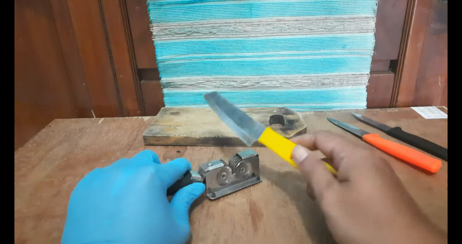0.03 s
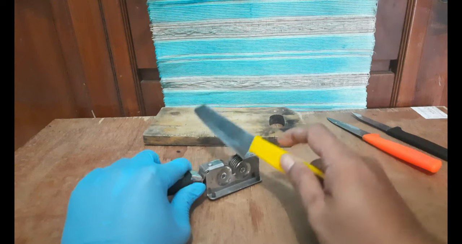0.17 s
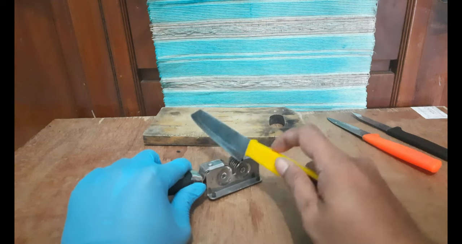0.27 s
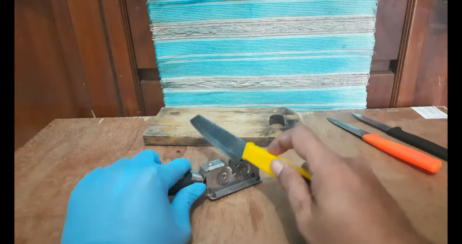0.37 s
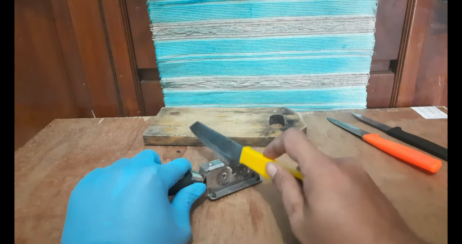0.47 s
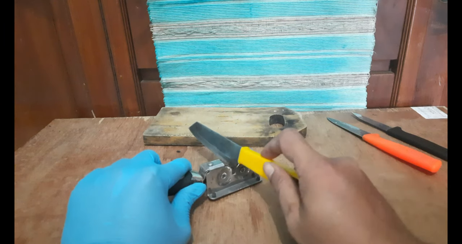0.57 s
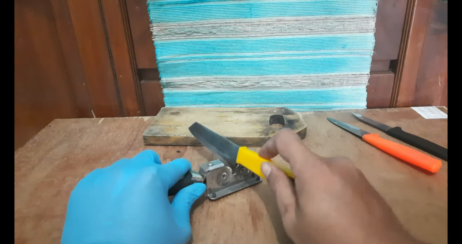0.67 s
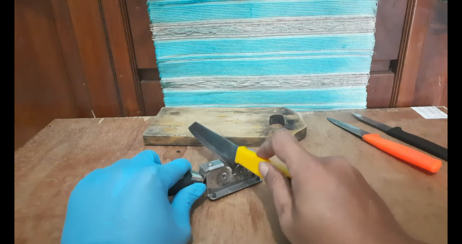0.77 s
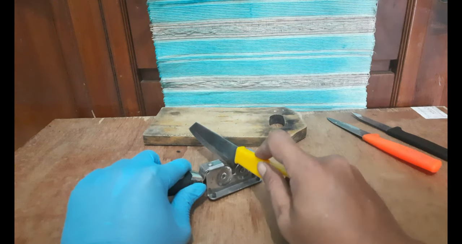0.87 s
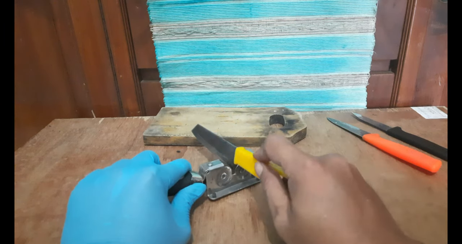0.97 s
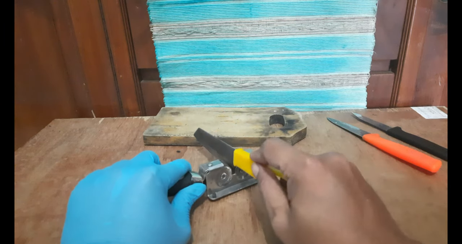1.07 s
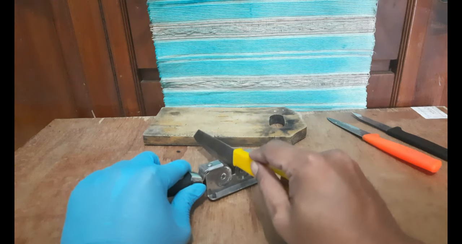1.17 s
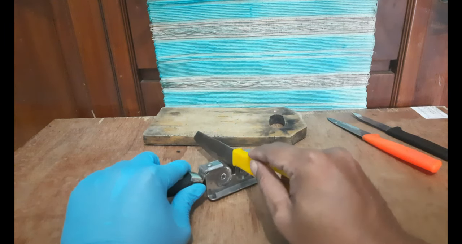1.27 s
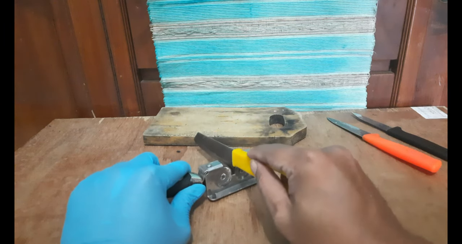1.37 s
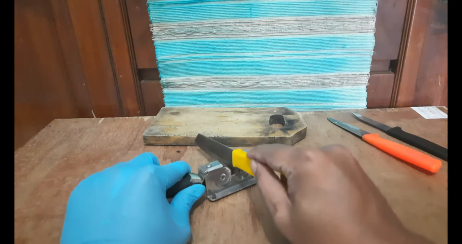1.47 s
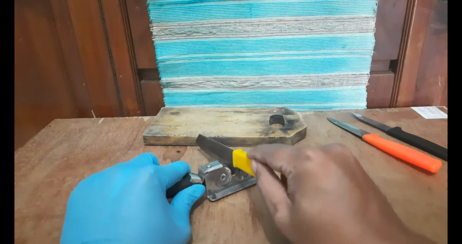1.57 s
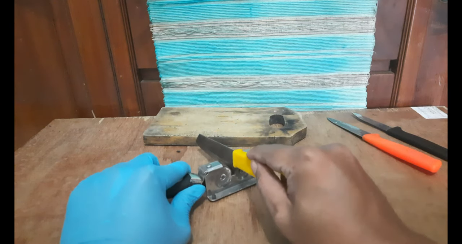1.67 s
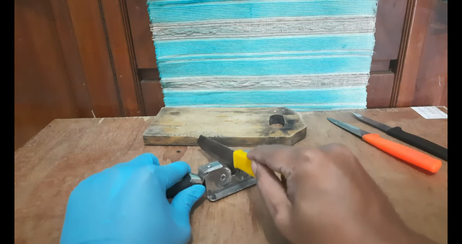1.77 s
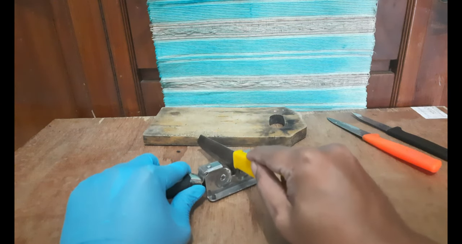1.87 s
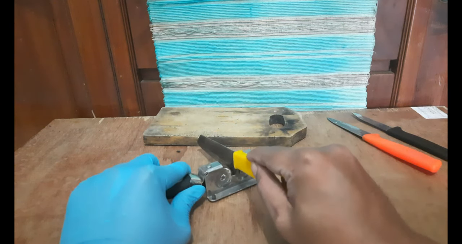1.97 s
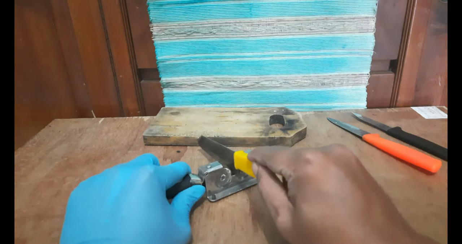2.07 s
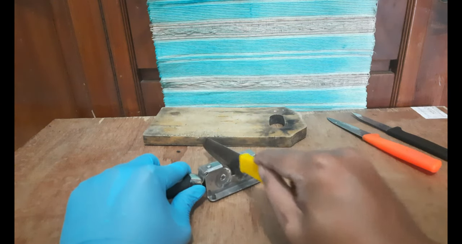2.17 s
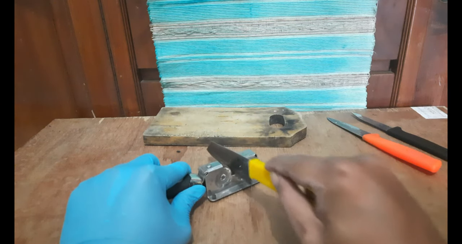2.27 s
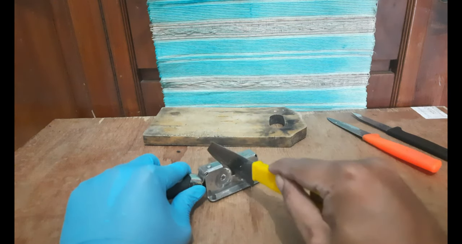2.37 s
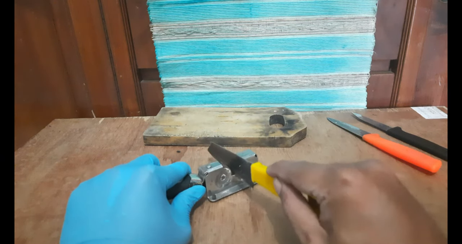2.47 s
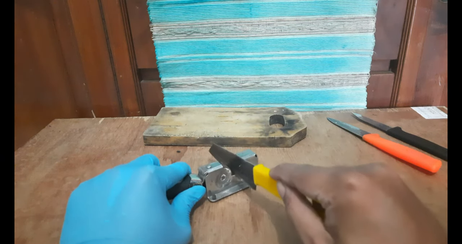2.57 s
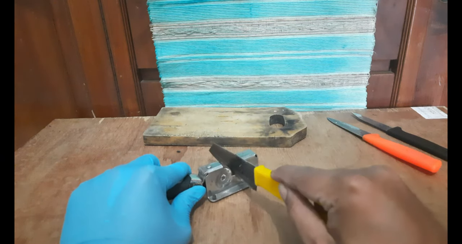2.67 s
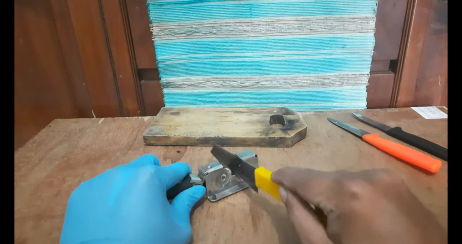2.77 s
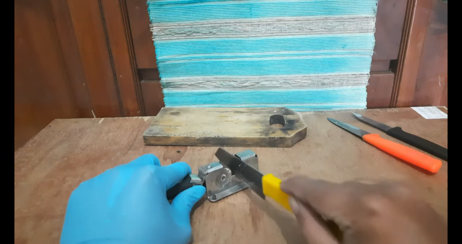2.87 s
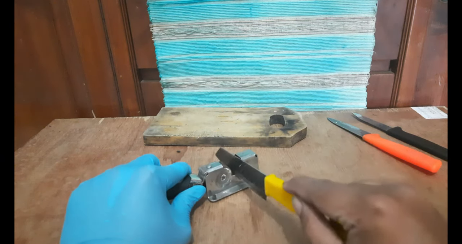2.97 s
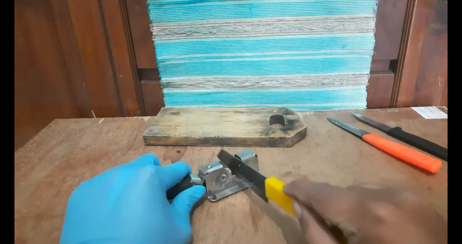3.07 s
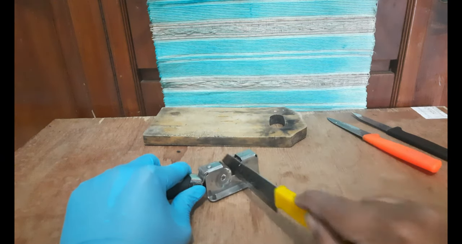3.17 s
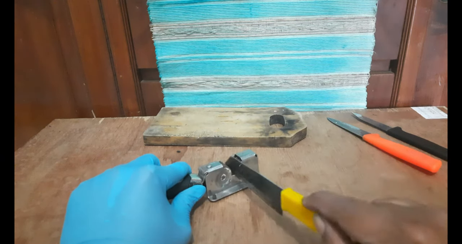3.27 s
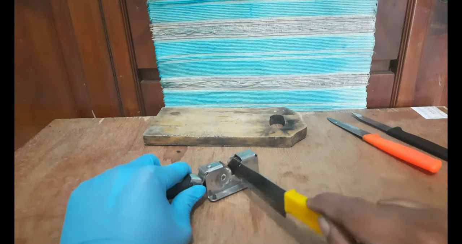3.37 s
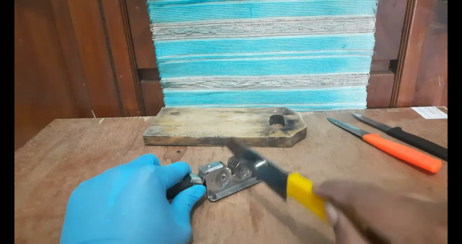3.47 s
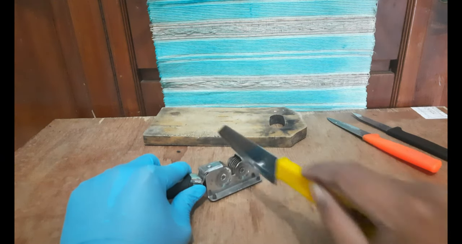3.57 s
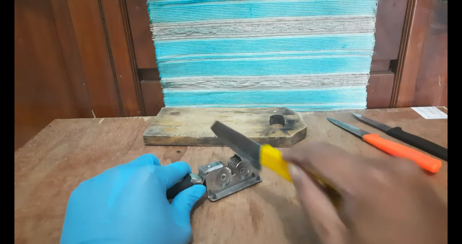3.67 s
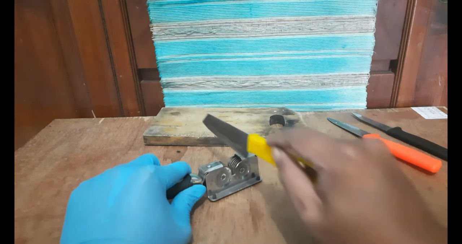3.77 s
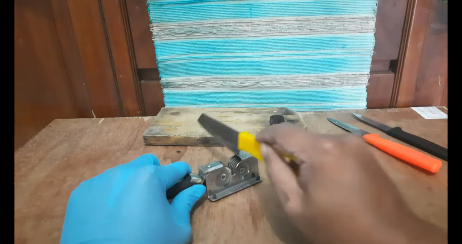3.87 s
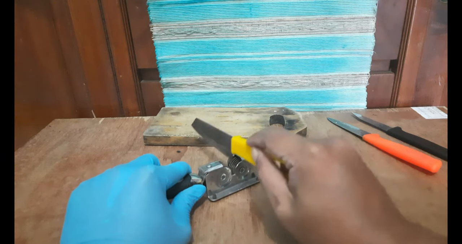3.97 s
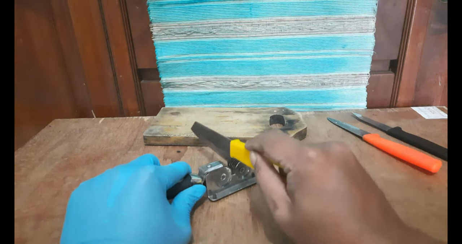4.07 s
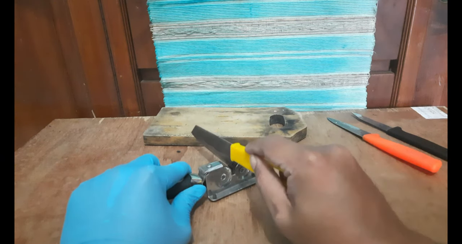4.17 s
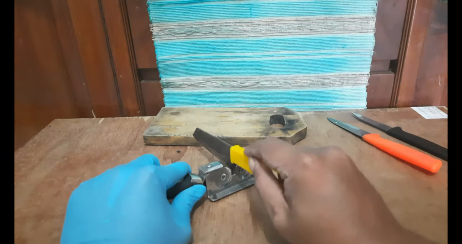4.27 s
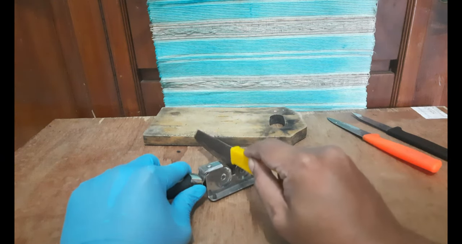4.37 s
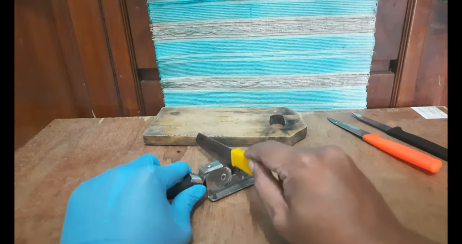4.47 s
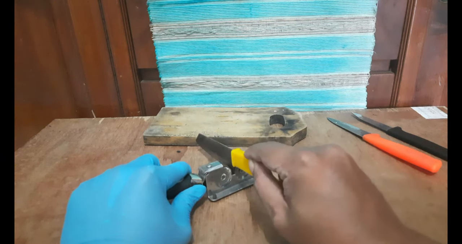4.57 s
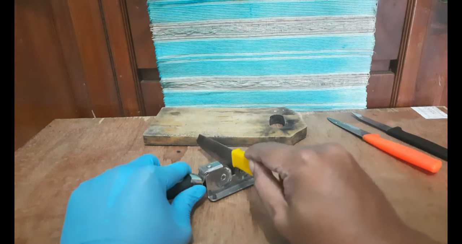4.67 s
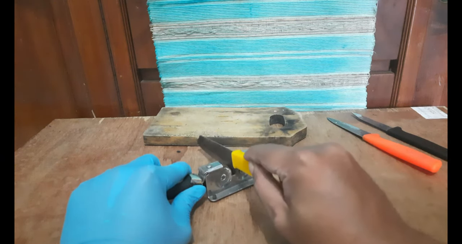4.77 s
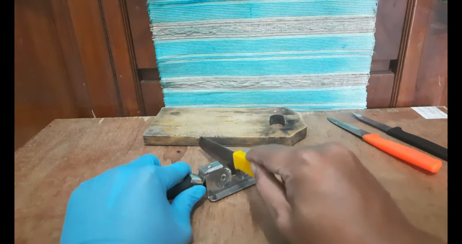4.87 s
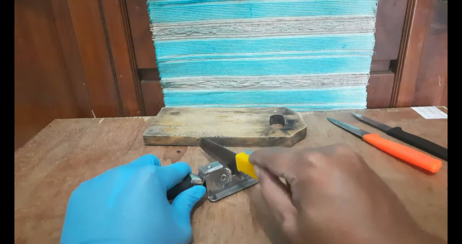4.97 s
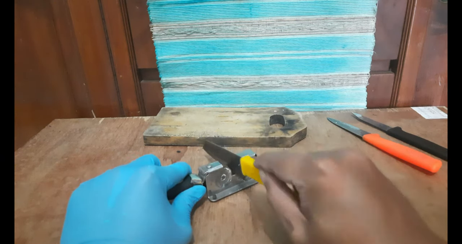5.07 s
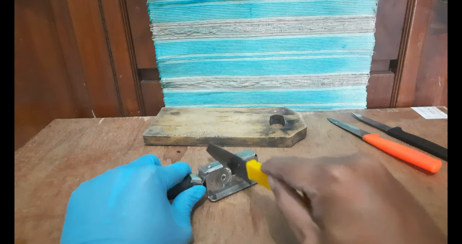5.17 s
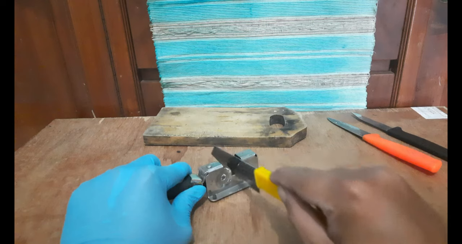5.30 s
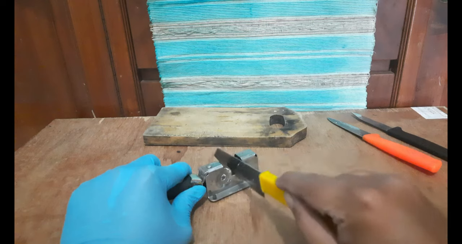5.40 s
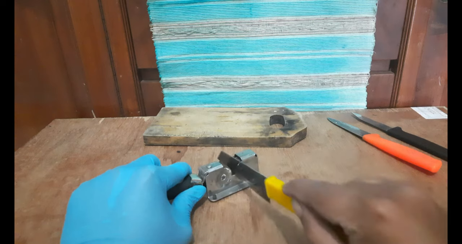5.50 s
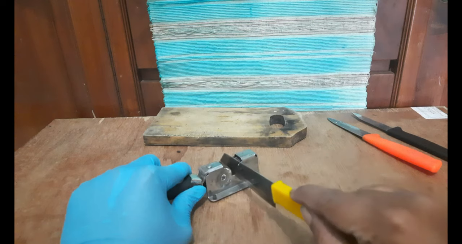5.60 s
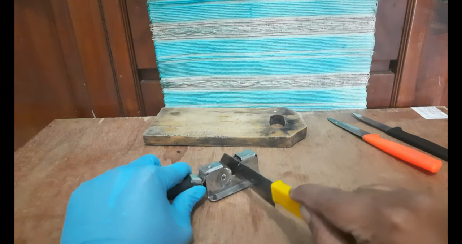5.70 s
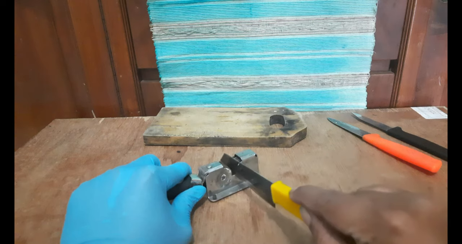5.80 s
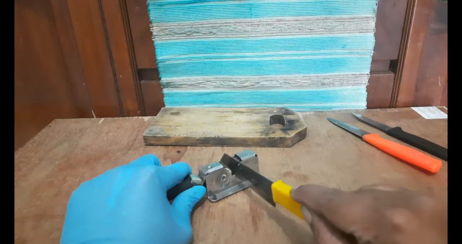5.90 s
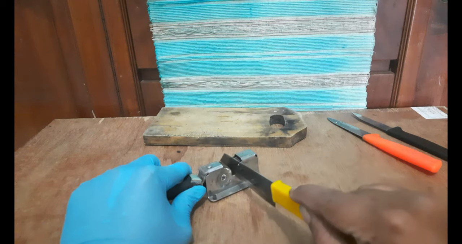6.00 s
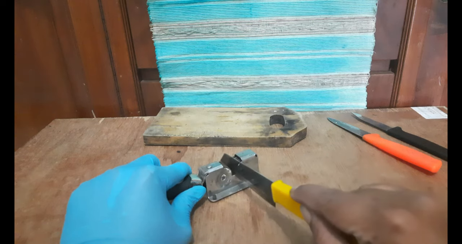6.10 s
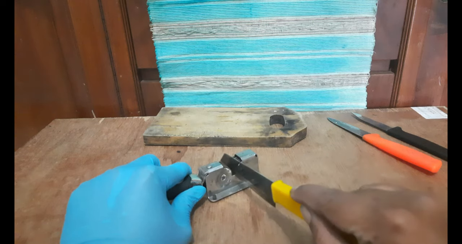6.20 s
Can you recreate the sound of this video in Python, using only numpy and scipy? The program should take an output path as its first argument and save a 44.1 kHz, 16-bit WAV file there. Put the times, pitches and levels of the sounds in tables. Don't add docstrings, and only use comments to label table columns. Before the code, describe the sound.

Faint room hush and tiny taps come first. A blade clinks onto a metal sharpener and catches repeatedly, giving stuttering, raspy metal scrapes with woody thumps from the table and one especially sharp clack at the end. A quiet pause follows, then a slower coarse scrape in joined strokes, ending in soft knocks. Close stereo pickup, short natural room reflections, the sound dry and detailed.

```python
import sys
import numpy as np
from scipy import signal
from scipy.fft import rfft, irfft, next_fast_len
from scipy.io import wavfile
from scipy.ndimage import map_coordinates

SR = 44100
rng = np.random.default_rng(int(sys.argv[2]) if len(sys.argv) > 2 else 0)


def magnitude_from_level(level_db):
    exponent = np.asarray(level_db, float) / 20
    return 10 ** exponent


def inscribe(sig):
    pcm = np.round(np.clip(np.atleast_2d(sig).T, -1, 1) * 32767)
    wavfile.write(sys.argv[1], SR, pcm.astype(np.int16))


N = 275184

# (start [s], length [s], load [dB], load change [dB], bite [dB])
JERKS = [(1.066, 0.26, -51.5, -8, 4), (1.514, 0.026, -37.5, 5, -3.5), (1.555, 0.027, -41, -18.5, -23.5),
         (1.755, 0.038, -46, -1, -3.5), (1.804, 0.11, -24.5, -14, -3.5), (2.002, 0.02, -35.5, -10, 10.5),
         (2.03, 0.022, -26, 1.5, -20.5), (2.093, 0.028, -32.5, 5, -13.5), (2.122, 0.21, -29.5, 2, 2),
         (2.514, 0.1, -39, 5.5, -0.5), (2.783, 0.072, -38.5, 5, 5), (2.885, 0.032, -28, -1, 6),
         (3.08, 0.11, -40.5, 3.5, 8), (3.205, 0.15, -26.5, -14.5, 3), (3.393, 0.034, -31.5, -4, -10.5)]
# (start [s], length [s], load [dB], load change [dB], bite [dB])
SLOW_PULL = [
    (4.763, 0.11, -31, 0, -27.5),
    (4.897, 0.068, -26, 1, -22),
    (4.989, 0.041, -32.5, 3, -5),
    (5.032, 0.13, -35.5, 6.5, -4),
    (5.207, 0.19, -27.5, 0, -2.5),
    (5.428, 0.18, -33.5, 2, -2),
]
# (start [s], length [s], load [dB], load change [dB], bite [dB])
SHIFTS = [(0.997, 0.066, -62, 13, -29), (1.35, 0.12, -45, 2.5, -30.5), (1.669, 0.07, -40.5, 2.5, -41),
          (2.465, 0.019, -63.5, 7.5, -10), (2.722, 0.14, -51.5, -4.5, -10), (3.334, 0.036, -51.5, 1, -14),
          (4.202, 0.11, -59.5, 10, -18), (4.431, 0.078, -44.5, 1, -34), (4.623, 0.069, -58, 0.5, -17),
          (5.853, 0.092, -41, -5, -7.5), (6.011, 0.17, -41, -21.5, -23)]


def unit(x):
    return x / np.sqrt(np.mean(x ** 2) + 1e-20)


def along(points, hz):
    f, v = np.transpose(points)
    return np.interp(np.log(hz + 1), np.log(f + 1), v)


def filtered(x, response):
    m = next_fast_len(N + SR // 2)
    return irfft(rfft(x, m) * response(np.fft.rfftfreq(m, 1 / SR)), m)[..., :N]


def body(modes):
    def shape(f):
        total = 0
        for k, (centre, width, db) in enumerate(modes):
            resonance = 1j * f * width / (centre ** 2 - f * f + 1j * f * width)
            total = total + (-1) ** k * magnitude_from_level(db) * resonance
        return total

    norm = np.sqrt(np.mean(np.abs(shape(np.arange(SR // 2))) ** 2))
    return lambda f: shape(f) / norm


def room_tone():
    # (frequency [Hz], level [dB per Hz])
    quiet = [(15, -40), (25, -10), (102, 0), (194, -5), (255, 0), (425, -7), (604, -16), (1090, -21),
             (1680, -21), (2970, -32), (6660, -38.5), (8730, -30), (10500, -35), (15800, -36)]
    # (frequency [Hz], likeness [0-1])
    alike = [(60, 0), (290, 0), (640, 0), (1500, 0.8), (15000, 0.48)]
    # (frequency [Hz], level [dB])
    quiet_lean = [(60, 15), (240, 5.5), (950, 6.5), (3770, 4), (15000, 8)]

    def colour(f):
        turn = np.arccos(np.clip(along(alike, f), -1, 1)) / 2
        whine = 1 + magnitude_from_level(3) / (1 + ((f - 8750) / 70) ** 2)
        return magnitude_from_level(along(quiet, f)) * whine * [np.cos(turn), np.sin(turn)]

    mid, side = filtered(rng.standard_normal((2, N)), colour)
    pair = filtered(np.array([mid + side, mid - side]),
                    lambda f: magnitude_from_level(np.outer([.5, -.5], along(quiet_lean, f))))
    drift = map_coordinates(rng.standard_normal(40), [np.arange(N) * 5 / SR])
    return magnitude_from_level(-68 - 1.5 + 1.2 * drift) * pair / np.std(mid)


def knocks():
    # (time [s], frame peak [dB], table minus frame [dB], blade minus frame [dB])
    strikes = [(1.0682, -49, -21, 13), (1.4815, -44.5, -1.5, -9), (1.519, -38.5, 4, -13),
               (1.7703, -35.5, 5.5, -38), (1.8047, -23, 4.5, -5), (2.0034, -30.5, 13, -8.5),
               (2.0912, -27, -5, -23), (2.187, -33.5, 11, -15), (2.2134, -23, -28, -34),
               (2.2986, -24, 1.5, -4.5), (2.519, -34, 7.5, -20), (2.5665, -27.5, 10, -17),
               (2.607, -26, 3.5, -24.5), (3.075, -46.5, 12, -9), (3.1975, -35.5, 6, -17),
               (3.2032, -19.5, 2, 2.5), (3.2434, -43, 16.5, -15), (3.396, -44, 12, -7.5),
               (3.418, -51.5, 13, -22), (3.4751, -61.5, -5, 8.5), (4.1185, -95.5, 17, 11),
               (4.768, -46, 14.5, -24.5), (4.8987, -40, 14.5, -29), (4.99, -42.5, 18.5, -6),
               (5.1313, -39.5, 13.5, -9), (5.1877, -27, -1, -11.5), (5.6198, -25, -14, -14)]
    # (time [s], frame peak [dB], table minus frame [dB])
    catches = [(0.5388, -59, 8), (0.651, -57.5, 3), (0.7528, -50.5, -7), (1.3514, -60, 4),
               (1.3892, -68, 23), (1.4247, -71, 14), (1.5453, -37, 11), (1.6734, -51, 14.5),
               (1.7566, -49, 16), (1.8188, -47, 19), (1.8939, -35.5, 5.5), (2.1216, -43, 25),
               (2.2623, -42, 22.5), (2.3194, -25, 1), (2.7837, -36.5, 13), (2.8967, -28.5, -6),
               (4.2127, -66, 15), (4.4706, -58.5, 14), (4.6857, -62.5, 16), (5.2746, -32, 4.5),
               (5.8534, -45, 4), (6.025, -51, -2), (6.105, -83.5, 34.5)]
    # (time [s], frequency [Hz], level [dB], t60 [s])
    ring_modes = [
        (1.8057, 5290, -41, 0.032),
        (3.2052, 5785, -32, .012),
        (3.426, 11600, -62.5, .04),
        (3.4413, 13960, -59.5, .02),
        (3.4744, 8960, -69, 0.013),
        (4.1184, 8600, -70, .02),
        (4.768, 1224, -41.5, 0.053),
        (5.6227, 10200, -52, 0.013),
        (5.858, 1297, -51.5, 0.035),
        (6.023, 1278, -60.5, 0.06),
    ]
    catch_blade_db = -40
    force = np.zeros((4, N + SR))
    t = np.arange(SR // 8) / SR
    push = t * np.exp(-t / 0.00028)
    rattle_t60 = np.array([[.014], [.006]])  # frame, blade [s]
    rattle_decay = magnitude_from_level(-60 * t / rattle_t60) + magnitude_from_level(-20.5 - 60 * t / 0.0057)
    rattle_shape = rattle_decay * (1 - np.exp(-t / 0.00051))
    for s, db, table_db, blade_db in strikes + [(*row, catch_blade_db) for row in catches]:
        rattle = rng.standard_normal((2, len(t))) * rattle_shape
        parts = np.vstack([push, rattle])
        parts /= np.linalg.norm(parts, axis=1, keepdims=True)
        part_db = np.array([[table_db + 6.5], [12], [blade_db + 1.5]])
        force[:3, round(s * SR):][:, :len(t)] += parts * magnitude_from_level(db + part_db)
    for s, hz, db, t60 in ring_modes:
        waver = np.cumsum(rng.normal(0, hz / 14000, len(t)))
        ring = np.sin(2 * np.pi * hz * t + waver) * magnitude_from_level(-60 * t / t60) * (1 - np.exp(-t * hz / 2))
        force[3, round(s * SR):][:len(t)] += ring / np.linalg.norm(ring) * magnitude_from_level(db + 23.5)
    return force[:, :N]


def slips(rate, scatter_db, smooth):
    timing, luck, side = rng.random((3, N))
    size = magnitude_from_level(-scatter_db * np.log(luck + .01)) * np.sign(side - .5)
    return unit(unit((timing < rate / SR) * size) + smooth * rng.standard_normal(N))


def pulls(rows, part):
    follow = {"table": (-6.5, 1.87, 0.3, -0.7, 233), "frame": (-17.5, 1.69, 0.6, 0, 323),
              "discs": (-21.5, 1.97, 0.93, -0.5, 294), "grit": (-35.5, 2, 1.02, 0, 317)}
    attack_db_per_s, surge_s = 3006, 0.014
    over_db, swing, share, held_db, release = follow[part]
    t, gain = np.arange(N) / SR, np.zeros(N)
    for s, length, load_db, change_db, bite_db in rows:
        near = slice(max(round(s * SR) - SR // 10, 0), round((s + length) * SR) + SR // 2)
        u = t[near] - s
        onset = attack_db_per_s * np.minimum(u, 0)
        fade = release * np.maximum(u - length, 0)
        start_offset = held_db * np.exp(-np.abs(u) / surge_s)
        drift = swing * change_db * np.clip(u / length, 0, 1)
        gain[near] += magnitude_from_level(load_db + over_db + share * bite_db + drift + onset - fade - start_offset)
    return gain


def table_top(push, coarse):
    # (frequency [Hz], width [Hz], level [dB])
    table_modes = [(84, 60, -18), (129.3, 11, -6), (229.6, 48, 5), (246.7, 188, -6), (283.7, 13.3, 6.5),
                   (336, 74.4, -8), (429.6, 29.4, -0.5), (530, 151.4, -8.5), (569.4, 161, -16)]
    # (frequency [Hz], level [dB])
    slow_table = [(70, 7), (130, -1.5), (210, -3.5), (300, 0), (500, 1)]
    rest_db = -79.5
    quick = (pulls(JERKS + SHIFTS, "table") + magnitude_from_level(rest_db)) * coarse
    slow = filtered(pulls(SLOW_PULL, "table") * coarse, lambda f: magnitude_from_level(along(slow_table, f)))
    return filtered(push + quick + slow, body(table_modes))


def frame_and_discs(rattle, drag):
    # (frequency [Hz], width [Hz], level [dB])
    frame_modes = [(699, 23, -8.5), (848, 92, -8.5), (1266.5, 47.4, 0.5), (1386, 266, -8.5),
                   (1679, 131, -2.5), (1904, 390, -10)]
    # (frequency [Hz], width [Hz], level [dB])
    disc_modes = [(2288, 196, -6.5), (2504, 74, -3.5), (2820, 116, -18.5), (2936, 130, -16)]
    heavy_hz = 3200
    slow_gain = magnitude_from_level(-1) * pulls(SLOW_PULL + SHIFTS, "discs")
    discs = magnitude_from_level(-13.5) * rattle + (pulls(JERKS, "discs") + slow_gain) * drag
    frame = rattle + pulls(JERKS + SLOW_PULL + SHIFTS, "frame") * drag
    merged = body([(1210, 2830, 0)])
    panel = magnitude_from_level(-4.5) * filtered(frame, lambda f: merged(f) ** 2 / 3)
    heavy = filtered(frame, body(frame_modes)) + panel + filtered(discs, body(disc_modes))
    return filtered(heavy, lambda f: heavy_hz ** 2 / (heavy_hz ** 2 - f * f + 1.4j * f * heavy_hz))


def clink():
    # (time [s], frequency [Hz], level [dB], t60 [s])
    partials = [
        (1.068, 5080, -51, .15),
        (1.068, 8950, -57, .09),
        (1.068, 3800, -64, .3),
        (1.068, 12100, -62, .05),
    ]
    out, t = np.zeros(N + SR), np.arange(SR // 3) / SR
    for s, hz, db, t60 in partials:
        waver = np.cumsum(rng.normal(0, .1, len(t)))
        out[round(s * SR):][:len(t)] += magnitude_from_level(db - 60 * t / t60) * np.sin(2 * np.pi * hz * t + waver)
    return out[:N]


def blade_rasp(rattle, coarse, fine):
    # (frequency [Hz], width [Hz], level [dB])
    blade_modes = [(4550, 1400, 2.8), (5630, 900, 4), (5800, 890, 2.3), (8860, 260, 4), (9300, 460, 7.1),
                   (10200, 140, 8.4), (11200, 730, 8.4)]
    # (frequency [Hz], level [dB per Hz])
    grit = [(1500, 4.5), (3000, 3.5), (4500, -0.5), (6200, -6), (7800, -14), (10000, -5), (13000, -14.5),
            (15500, -11)]

    def rasp(f):
        peaks = sum(magnitude_from_level(db) / (1 + (2 * (f - c) / w) ** 2) for c, w, db in blade_modes)
        return magnitude_from_level(along(grit, f) + 7) * np.sqrt(1 + peaks)

    scrape = pulls(JERKS + SLOW_PULL, "grit") * unit(.19 * coarse + fine)
    return filtered(rattle + scrape, rasp)


def sharpener():
    coarse = slips(1400, scatter_db=2.5, smooth=0.78)
    fine = slips(5000, scatter_db=3.5, smooth=1.2)
    drag = unit(coarse + 0.81 * fine)
    table_push, frame_rattle, blade_rattle, ring = knocks()
    steel = frame_and_discs(frame_rattle, drag) + blade_rasp(blade_rattle, coarse, fine) + ring + clink()
    return table_top(table_push, coarse) + steel


def echoes(x, t60, share, delay, size):
    x, wet = np.pad(x, (size, 2 * size)), np.zeros((2, N + 8 * size))
    for start in range(0, N + size, size):
        hz, t, z = signal.stft(rng.standard_normal((2, size)), SR, nperseg=128)
        decay = magnitude_from_level(-60 * t / along(t60, hz)[:, None])
        tail = signal.istft(z * decay, SR, nperseg=128)[1]
        piece = x[start:start + 2 * size] * np.hanning(2 * size)
        answer = signal.fftconvolve(piece[None], tail / np.linalg.norm(tail[0]), axes=1)
        wet[:, start:start + answer.shape[1]] += answer
    delayed = wet[:, size - round(delay * SR):][:, :N]
    return filtered(delayed, lambda f: magnitude_from_level(along(share, f)))


def room(x):
    # (frequency [Hz], level [dB])
    near_share = [(100, -67.5), (300, -21.5), (1000, 2.5), (3000, 4.5), (14000, 7.5)]
    # (frequency [Hz], t60 [s])
    walls = [(150, 0.56), (600, 0.096), (2000, 0.36), (6000, 0.41), (14000, 0.13)]
    # (frequency [Hz], level [dB])
    wet_share = [(100, 0), (300, -29), (700, 6), (2000, -12.5), (14000, 2)]
    near = echoes(x, [(1000, 0.022)], near_share, delay=.0004, size=4096)
    return near + echoes(x, walls, wet_share, delay=.004, size=14000)


def scene():
    # (frequency [Hz], level [dB])
    lean = [(60, 4.5), (250, 0), (1300, 1), (4000, -0.5), (9000, 5), (15000, 5.5)]
    lead_s = .00012
    half = np.array([[.5], [-.5]])
    tool = sharpener()
    ports = lambda f: magnitude_from_level(half * along(lean, f)) * np.exp(2j * np.pi * f * half * lead_s)
    return filtered(tool + room(tool), ports) + room_tone()


def top_cut(x):
    return signal.sosfilt(signal.butter(12, 16810, fs=SR, output="sos"), x)


def record(dry):
    low_cut_hz, top_hz = 53, 15800
    mix = filtered(dry, lambda f: (f < top_hz) * 1j * f / (low_cut_hz + 1j * f))
    return top_cut(mix)


dry = scene()
out = record(dry)
inscribe(out)
```